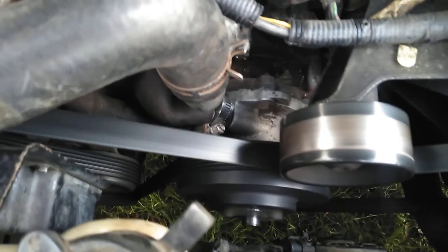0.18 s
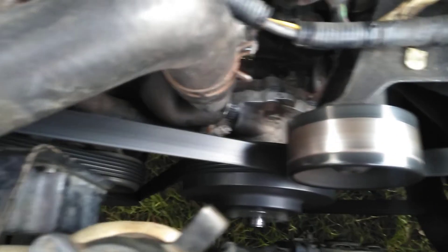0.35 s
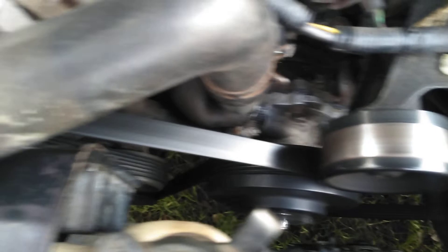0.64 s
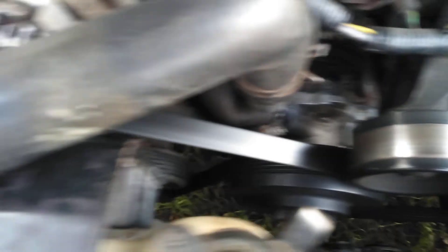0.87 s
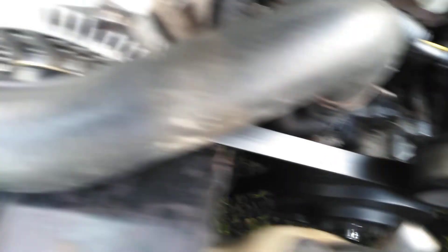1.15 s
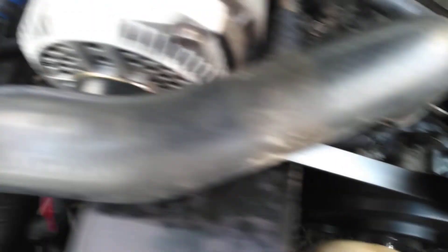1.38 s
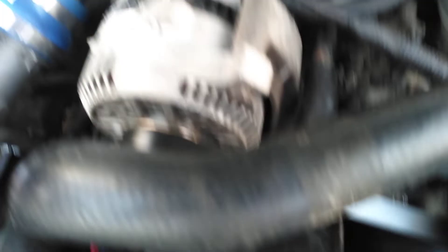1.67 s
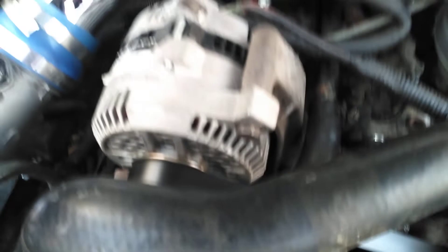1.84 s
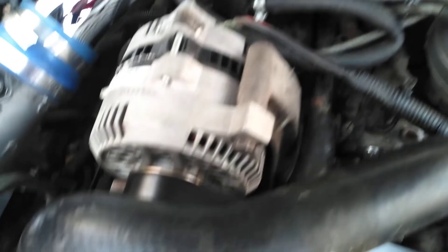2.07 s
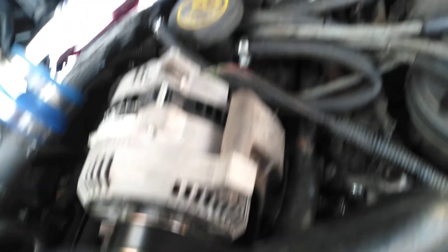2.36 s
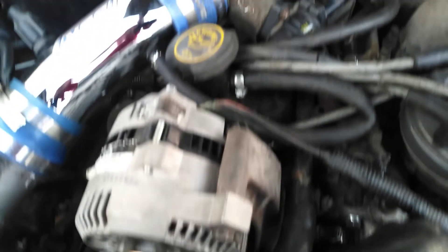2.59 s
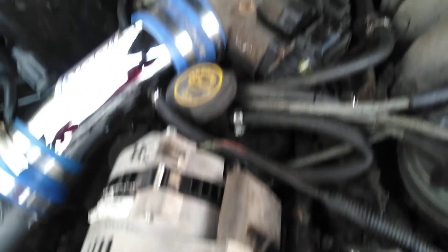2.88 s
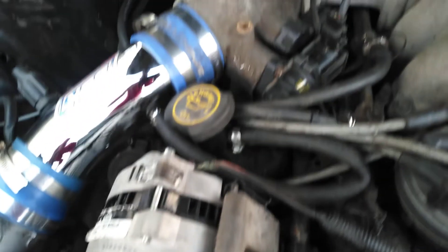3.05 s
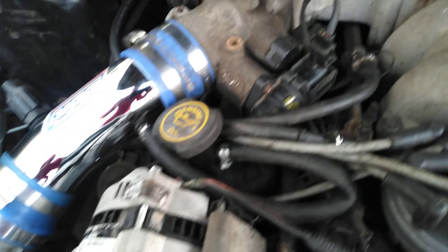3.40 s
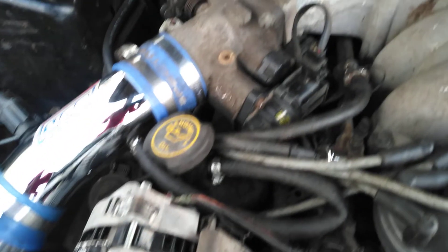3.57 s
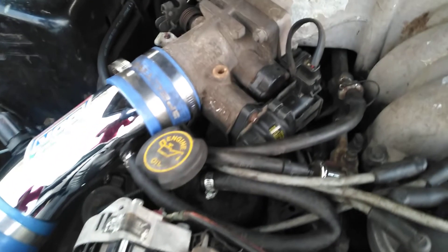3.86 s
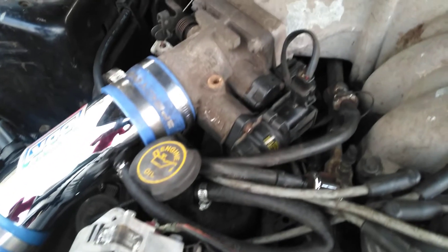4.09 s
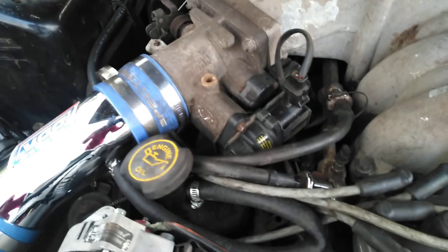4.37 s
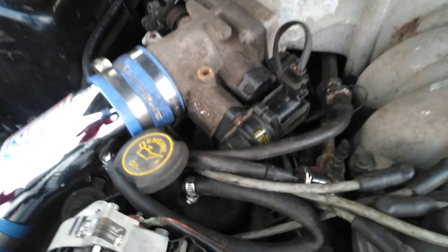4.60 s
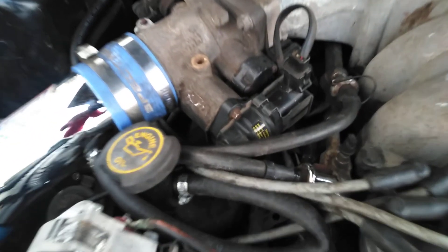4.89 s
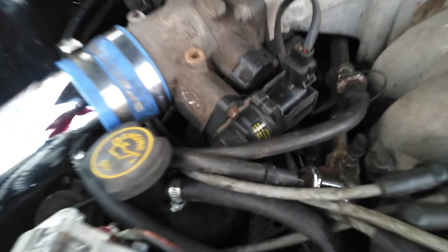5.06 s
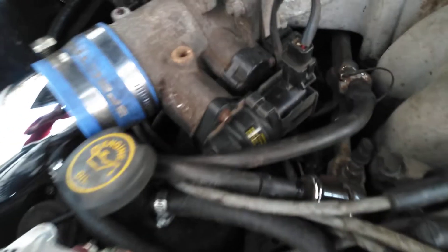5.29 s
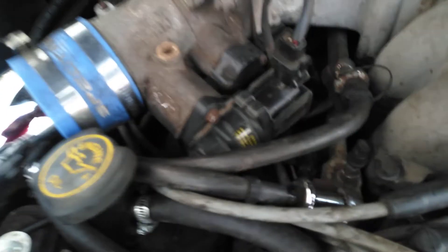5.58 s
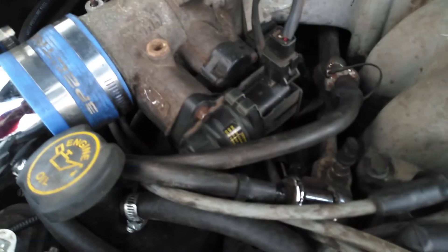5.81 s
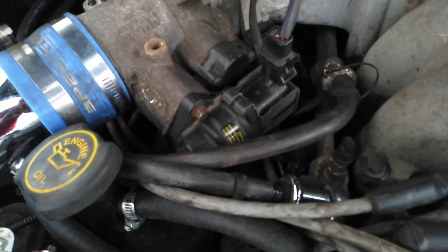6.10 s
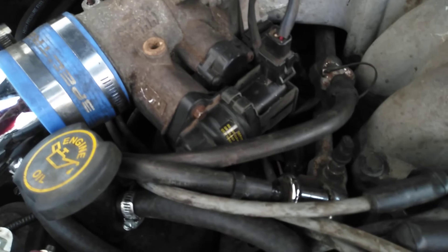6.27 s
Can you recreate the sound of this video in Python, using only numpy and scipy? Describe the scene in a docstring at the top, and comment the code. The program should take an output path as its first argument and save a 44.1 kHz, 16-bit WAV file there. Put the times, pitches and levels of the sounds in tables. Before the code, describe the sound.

A V8 car engine idles close up, its deep hum swelling into throbs over hissing belts and light ticking.

```python
"""V8 idling, close up in an open engine bay

The microphone travels from the belt tensioner past the alternator to the intake. A deep hum comes in
swells, throbbing once per crank turn. The fan chops a bright hiss, a pulley drones, a bearing whistles,
valves and injectors tick, the belt scuffs, and the metal parts nearest the microphone ring along."""
import sys
import numpy as np
from scipy import signal
from scipy.fft import rfft, irfft
from scipy.io import wavfile
from scipy.ndimage import uniform_filter1d, map_coordinates

SR = 44100
rng = np.random.default_rng(int(sys.argv[2]) if len(sys.argv) > 2 else 0)


def wrap_up_sound(samples):
    """Save the sound to the file named by the first command line argument, as 16-bit audio."""
    columns = np.atleast_2d(samples).T
    # keep every value between -1 and 1, then stretch to whole-number steps
    tamed = np.clip(columns, -1, 1)
    steps = np.round(tamed * 32767).astype(np.int16)
    wavfile.write(sys.argv[1], SR, steps)


N = 284004
TIME = np.arange(N) / SR

# The crankshaft's uneven idle: time_s, speed_turns_per_s
CRANK_SPEED = [(0, 16.25), (.58, 16.6), (1.2, 15.81), (1.54, 15.92), (2.13, 16.67), (2.54, 16.27),
               (3.36, 15.9), (3.97, 17.0), (4.21, 17.01), (4.85, 15.92), (5.45, 16.38), (5.93, 16.03),
               (6.44, 16.14)]
# The microphone's path: time_s, place (0 tensioner, 1 alternator, 2 intake)
MIC_PATH = [(0, 0), (.8, .12), (1.7, .75), (2.5, 1.1), (3.6, 1.65), (5, 1.8), (5.5, 2)]


def amp(db):
    """Decibels to gain."""
    return 10 ** (np.asarray(db) / 20)


def unit(x):
    """Scales to rms 1."""
    return x / np.sqrt(np.mean(x ** 2) + 1e-20)


def curve(rows):
    """Rows of (time_s, value), joined by straight lines at every sample."""
    return np.interp(TIME, *np.transpose(rows))


def colour(x, spectrum):
    """Filters a sound by rows of (frequency_hz, gain_db) and scales it to rms 1."""
    hz, db = np.transpose(spectrum)
    gain_db = np.interp(np.log(np.fft.rfftfreq(N, 1 / SR) + 1), np.log(hz), db)
    return unit(irfft(rfft(x) * amp(gain_db), N))


def noise():
    """White noise."""
    return rng.standard_normal(N)


def drift(rate_hz):
    """A random wander of rms 1, with swings up to about this rate."""
    return unit(irfft(rfft(noise()) / (1 + (np.fft.rfftfreq(N, 1 / SR) / rate_hz) ** 4), N))


def ring(x, hz, width_hz):
    """Passes a sound twice through a resonance, for steep skirts, and scales it to rms 1."""
    peak = signal.iirpeak(hz, hz / width_hz, SR)
    return unit(signal.lfilter(*peak, signal.lfilter(*peak, x)))


def bump(turns, centre, width):
    """A smooth lobe that comes round once per turn."""
    return np.exp(-.5 * (((turns - centre + .5) % 1 - .5) / width) ** 2)


def shaft_tones(turns, orders, waver_db, slip_turns=.05):
    """Multiples of a shaft's speed, each wavering in level and timing."""
    return sum(amp(db + waver_db * drift(1.6)) * np.sqrt(2)
               * np.cos(2 * np.pi * (order * turns + slip_turns * drift(8))) for order, db in orders)


def overspeed(idle_turns_per_s=16.25):
    """Crank turns per second above the nominal idle."""
    return curve(CRANK_SPEED) - idle_turns_per_s


def at_microphone(column):
    """A level or a depth of fan chop, blended as the microphone moves from place to place."""
    # The balance at tensioner, alternator and intake, under these columns:
    columns = ["churn_db", "clatter_db", "hiss_db", "clatter_chop", "hiss_chop"]
    stations = [(-43, -43, -33.5, 0.41, 0.31), (-40, -41.5, -33.5, 0.86, 0.24), (-41, -41, -34, 0.3, 0.13)]
    values = np.array(stations)[:, columns.index(column)]
    return np.interp(curve(MIC_PATH), np.arange(len(stations)), values)


def hum(crank, duck_load=.083):
    """The engine's steady hum gives way to throbs: short booms locked to the crank, with a rumble."""
    # Tones of the steady hum: crank_multiple, level_db
    hum_orders = [(4, -52), (5, -58), (6, -48), (6.5, -46), (7, -31), (7.5, -44.5), (8, -41), (9, -55)]
    speed, boom, swell = curve(CRANK_SPEED), np.zeros(N), np.zeros(N)
    for time_s, db, hz, half_s in throbs(crank):
        span = slice(max(0, int((time_s - .07) * SR)), int((time_s + .07) * SR))
        t = TIME[span] - time_s
        envelope = amp(db) * np.exp(-.5 * (t / half_s) ** 2)
        cycles = 7 * (crank[span] - speed[span] * t) + hz * t  # phase tied to the 7th crank order
        # the more abrupt the throb, the more it thuds an octave higher
        thud = amp(-24) * (.01 / half_s) ** 3 * np.cos(4 * np.pi * cycles)
        boom[span] -= envelope * (np.cos(2 * np.pi * cycles) + thud)
        swell[span] += envelope
    load = uniform_filter1d(swell, size=4000)
    firing = np.cos(2 * np.pi * 4 * crank)  # four cylinders fire per turn
    overtone = swell * np.cos(2 * np.pi * 14 * crank)
    push = colour(noise(), [(18, -21), (27, -1), (32, -17), (39, -14), (49, 6), (70, -30), (300, -82)])
    rumble = colour(noise(), [(30, -12), (60, -25), (85, 7.5), (160, 3), (215, 2.5), (270, -38),
                              (500, -39), (2000, -90)])
    steady = amp(1.2) * shaft_tones(crank - .41, hum_orders, waver_db=1.5) / (1 + load / duck_load)
    under_load = load * (amp(-25) * firing + amp(-27) * rumble + amp(-36) * push)
    return boom + steady + amp(-33) * overtone + under_load


def burble(level_db=-39):
    """Uneven firing keeps the hum's resonance stirring between the regular beats."""
    return amp(level_db) * ring(noise(), hz=119, width_hz=30)


def pulley(crank, belt_ratio=2.025, db_per_turn_per_s=5.5):
    """A belt-driven pulley drones, louder as the engine speeds up."""
    # Tones of the drone: pulley_multiple, level_db
    orders = [(7, -65), (9, -53.5), (11, -53), (13, -54), (15, -57.5), (16, -61), (17, -83), (18, -62),
              (21, -58.5)]
    return amp(db_per_turn_per_s * overspeed()) * shaft_tones(belt_ratio * crank, orders, waver_db=1.8)


def chopped_air(crank, chop, valve_depth, flutter_db, fan_ratio=1.2, fan_blades=7):
    """Noise that pulses with each fan blade and with the louder valves."""
    # The louder valves' taps in the two-turn cycle: cycle_fraction, strength
    valves = [(.02, 0.34), (.19, 0.2), (.3, 0.3), (.45, 0.96), (.53, 0.36), (.84, 0.79)]
    blades = bump(fan_ratio * fan_blades * crank + .04 * drift(10), .5, .17)
    fan = (1 + chop * blades) / (1 + .57 * chop)
    taps = sum(strength * bump(crank / 2, fraction, .011) for fraction, strength in valves)
    return noise() * fan * (1 + valve_depth * taps) * amp(flutter_db * drift(40))


def turbulence(x, depth_db):
    """Patches of the spectrum swell and fade on their own."""
    spectra = signal.stft(x, nperseg=512)[2]
    across_pitch = uniform_filter1d(rng.standard_normal(spectra.shape), size=14, axis=0)
    patches = unit(uniform_filter1d(across_pitch, size=8, axis=1))
    return unit(signal.istft(spectra * amp(depth_db * patches), nperseg=512)[1][:N])


def machinery(crank):
    """Low churn of the block, clatter of the valve train and hiss of belt and fan."""
    # Spectra of the three noises: frequency_hz, relative_db
    churn_spectrum = [(20, 12.5), (28, 2), (40, -5), (60, 12), (120, 0.5), (210, 0), (270, -18), (330, 1.5),
                      (430, 1.5), (600, -13), (700, 1), (800, -4), (1100, -5), (1800, -49)]
    clatter_spectrum = [(600, 4.5), (1000, -5.5), (1280, 2), (1470, 4.5), (2000, 1), (2250, 3.5),
                        (2600, 4.5), (3300, 0.5), (4200, -14), (7000, -19.5)]
    hiss_spectrum = [(2000, -32.5), (3500, -4), (4200, -1), (4500, 2.5), (5300, 1), (5850, 1), (6200, -3.5),
                     (6950, -2.5), (8200, -8.5), (9500, -10.5), (10700, -18), (13000, -16.5), (14200, -24),
                     (16000, -20)]
    # The microphone leans in and back; churn and hiss follow only in part: time_s, clatter_gain_db
    nearness = [(0, 0), (1.4, 0.5), (1.95, 2), (2.7, -0.5), (3.4, -2), (3.9, -0.5), (4.7, -.5), (5.65, 2.1),
                (6.44, 0)]
    air = chopped_air(crank, chop=.4, valve_depth=.13, flutter_db=1.64)
    churn = colour(air, churn_spectrum)
    air = chopped_air(crank, at_microphone("clatter_chop"), valve_depth=.4, flutter_db=1.7)
    clatter = turbulence(colour(air, clatter_spectrum), depth_db=1)
    air = chopped_air(crank, at_microphone("hiss_chop"), valve_depth=.42, flutter_db=.71)
    hiss = turbulence(colour(air, hiss_spectrum), depth_db=.62)
    extra_speed, near_db = overspeed(), curve(nearness)
    acceleration = uniform_filter1d(np.gradient(extra_speed) * SR, size=8000)
    churn_db = at_microphone("churn_db") - .5 + 1.3 * extra_speed + .3 * near_db
    clatter_db = at_microphone("clatter_db") + extra_speed + .1 * acceleration + near_db
    hiss_db = at_microphone("hiss_db") - 1.02 + 1.2 * extra_speed + .47 * near_db
    return churn * amp(churn_db) + clatter * amp(clatter_db) + hiss * amp(hiss_db)


def ringing_parts(crank, reach=.69):
    """Each metal part rings on its modes, loudest as the microphone passes it."""
    # Modes of each part, heard from close by: pitch_hz, nominal_width_hz, level_db
    tensioner = [(541, 35, -51.5), (908, 36, -53), (1125, 31, -54.5), (1451, 21, -57), (2510, 78, -54),
                 (2770, 36, -53), (4670, 44, -49), (7700, 250, -53)]
    alternator = [(695, 120, -56.5), (1455, 126, -53.5), (2020, 99, -51.5), (2583, 41, -56),
                  (6840, 530, -47.5), (8600, 110, -59.5), (10140, 180, -65)]
    intake = [(1128, 44, -57.5), (1450, 160, -53.5), (1781, 66, -48), (1889, 65, -49), (2760, 29, -54.5),
              (5280, 170, -44.5), (5810, 120, -48), (6600, 94, -51), (7430, 61, -56), (8540, 140, -53),
              (10070, 91, -57.5)]
    mic_place, out = curve(MIC_PATH), np.zeros(N)
    for place, modes in enumerate((tensioner, alternator, intake)):
        drive = chopped_air(crank, at_microphone("hiss_chop"), valve_depth=.46, flutter_db=2)
        ringing = sum(amp(db) * ring(drive, hz, 1.2 * width) for hz, width, db in modes)
        out += ringing / (1 + ((mic_place - place) / reach) ** 4)
    return out


def bearing_whistles(wander_hz=9, waver_db=1.5, reach=.32, attack_s=.57):
    """The tensioner's bearing sings thin, wandering tones that fade as the microphone leaves it."""
    # Whistles at the tensioner: start_s, pitch_hz, level_db
    whistles = [(-.5, 2500, -50.5), (-.5, 2768, -52), (-.1, 4705, -45.5)]
    out = np.zeros(N)
    for start_s, hz, db in whistles:
        envelope = np.clip((TIME - start_s) / attack_s, 0, 1) * amp(db + waver_db * drift(9.7))
        out += envelope * np.sin(2 * np.pi * np.cumsum(hz + wander_hz * drift(22)) / SR)
    return np.sqrt(2) * out / (1 + (curve(MIC_PATH) / reach) ** 4)


def injectors(crank, first_fraction=.0094, open_fraction=.027, level_db=-12):
    """Each injector ticks as it opens and again as it shuts, once per two-turn cycle."""
    # The injectors' ticks in firing order: relative_db
    tick_levels = [-37, -36, -44, -44, -40, -29.5, -42, -46]
    cycle, ticks = crank / 2, np.zeros(N)
    for k, db in enumerate(tick_levels):
        opens = first_fraction + k / len(tick_levels)
        ticks += amp(db) * (bump(cycle, opens, .005) + bump(cycle, opens + open_fraction, .005))
    spectrum = [(3000, -24), (6000, -10), (9000, -11), (11000, -1), (12000, 5), (13000, -12),
                (14500, -10)]
    return amp(level_db) * ticks * colour(noise(), spectrum)


def bay_echoes(x, echo_db=-12, shift_s_per_place=.00042, count=14):
    """Short echoes off the metal around: their paths change as the microphone moves, so colours slide."""
    treble = signal.sosfilt(signal.butter(2, 1200, "high", fs=SR, output="sos"), x)
    mic_place, echoes = curve(MIC_PATH), np.zeros(N)
    for delay_s, slide, polarity in rng.uniform([.002, -1, -1], [.014, 1, 1], (count, 3)):
        source_s = TIME - delay_s - slide * shift_s_per_place * mic_place
        echoes += np.sign(polarity) * map_coordinates(treble, [source_s * SR], order=3)
    return (x + amp(echo_db) * echoes / np.sqrt(count)) / np.sqrt(1 + amp(echo_db) ** 2)


def throbs(crank, turn_fraction=.405, crank_multiple=7.3, edge_db=-14.5, roundness=1.4):
    """One throb per crank turn in a swell or stumble: time_s, level_db, pitch_hz, half_length_s."""
    # Swells of the hum, rising from edge_db and falling back: start_s, crest_s, end_s, crest_db
    swells = [(.1, .2, .24, -18), (.66, .84, .96, -12), (1.04, 1.14, 1.22, -9), (1.22, 1.53, 1.72, -3.3),
              (1.72, 1.88, 1.94, -9.5), (2.89, 3.0, 3.81, -3), (4.59, 5.02, 5.38, -5.5),
              (5.64, 5.98, 6.06, -11), (6.37, 6.41, 6.46, -14)]
    # Stumbles, single turns that boom short and hard: time_s, level_db, half_length_s
    stumbles = [(.693, -7.5, .012), (1.125, -6, .014), (3.535, -1.5, .012), (4.922, -1.5, .014),
                (5.111, -.3, .012), (5.237, -1, .01), (5.978, -1.3, .0095)]
    times = np.interp(np.arange(int(crank[-1]) + 1) + turn_fraction, crank, TIME)
    pitches = crank_multiple * np.interp(times, TIME, curve(CRANK_SPEED))
    stumble_at = {np.argmin(abs(times - row[0])): row for row in stumbles}
    for turn, (time_s, hz) in enumerate(zip(times, pitches)):
        late_s, louder_db, sharp_hz, stretch = rng.normal(0, [.0025, 1.3, 2.8, .14])
        if turn in stumble_at:
            time_s, db, half_s = stumble_at[turn]
            yield time_s, db, hz, half_s
            continue
        for start_s, crest_s, end_s, crest_db in swells:
            if start_s <= time_s < end_s:
                from_crest = np.interp(time_s, [start_s, crest_s, end_s], [1, 0, 1])
                db = crest_db + min(edge_db - crest_db, 0) * from_crest ** roundness
                yield time_s + late_s, db + louder_db, hz + sharp_hz, .0148 * np.exp(stretch)


def belt_scuffs():
    """The belt rubs a little harder for a moment."""
    # Brief rubs: time_s, level_db, centre_hz, nominal_width_hz, half_length_s
    scuffs = [(2.002, -36.5, 5300, 1200, .014), (2.11, -36, 8000, 2180, 0.0075),
              (2.353, -33.5, 6100, 2000, .009), (3.234, -32, 5400, 1000, 0.0071),
              (3.337, -32, 6440, 1300, 0.0078), (3.917, -46, 1540, 550, 0.15),
              (4.828, -29, 5970, 2600, 0.0069), (4.95, -35, 6050, 2200, .012),
              (5.186, -36.5, 1970, 800, 0.0049), (5.6, -33, 5400, 1000, 0.032),
              (5.754, -36, 1830, 600, .011), (6.178, -34, 5350, 990, 0.035)]
    rub = noise()
    return sum(amp(db) * np.exp(-.5 * ((TIME - time_s) / half_s) ** 2) * ring(rub, hz, .78 * width)
               for time_s, db, hz, width, half_s in scuffs)


def scene():
    """The engine bay at one moving microphone, with the crankshaft setting the rhythm."""
    crank = np.cumsum(curve(CRANK_SPEED)) / SR  # turns so far
    drone = pulley(crank)
    echoing = bay_echoes(machinery(crank) + belt_scuffs())
    close_parts = echoing + ringing_parts(crank) + bearing_whistles() + injectors(crank)
    return (hum(crank) + burble() + drone + close_parts)[None]


def record(dry, ceiling_db=-5, recovery_db_per_s=160, cutoff_hz=15720):
    """A limiter ducks everything under the biggest throbs; a steep low-pass trims the top."""
    over_db = np.maximum(20 * np.log10(abs(dry[0]) + 1e-9) - ceiling_db, 0)
    recovery_db = TIME * recovery_db_per_s
    duck_db = uniform_filter1d(np.maximum.accumulate(over_db + recovery_db) - recovery_db, size=120)
    lowpass = signal.firwin(1023, cutoff_hz, window=("kaiser", 9), fs=SR)
    return signal.oaconvolve(dry / amp(duck_db), lowpass[None], "same")


dry = scene()
out = record(dry)
wrap_up_sound(out)
```